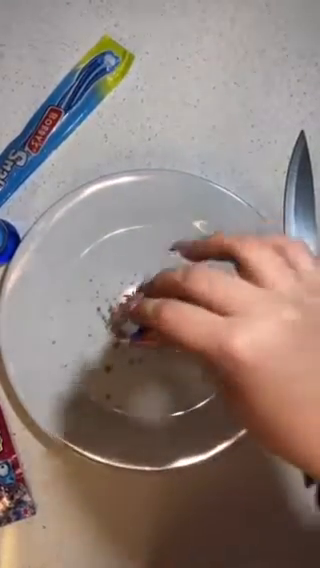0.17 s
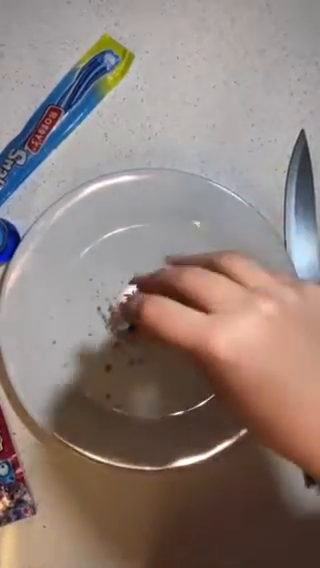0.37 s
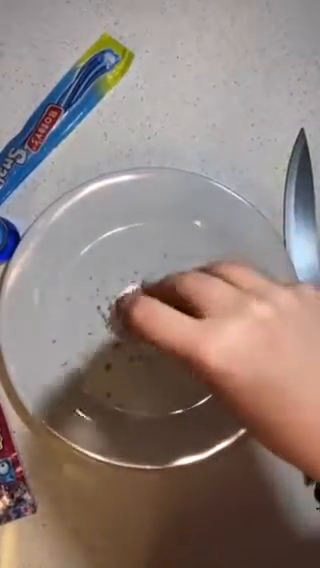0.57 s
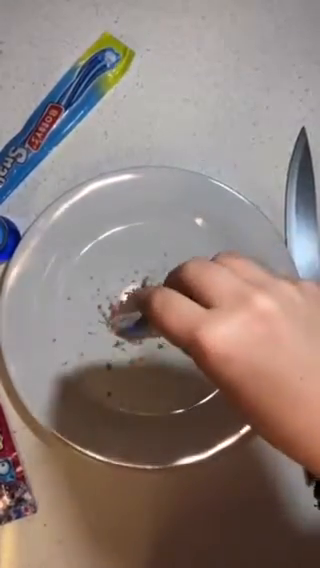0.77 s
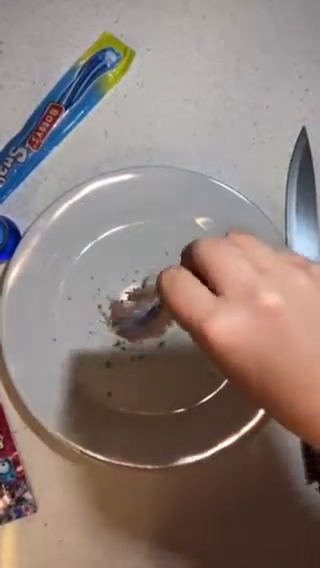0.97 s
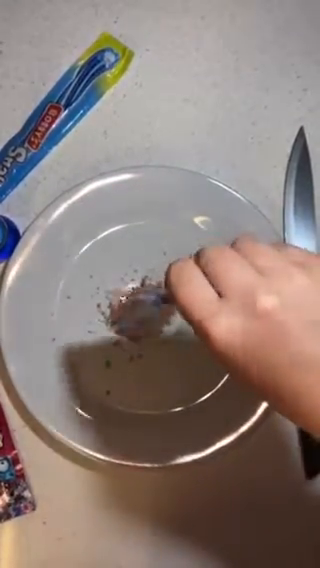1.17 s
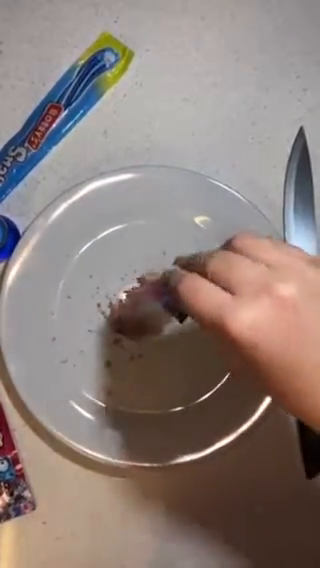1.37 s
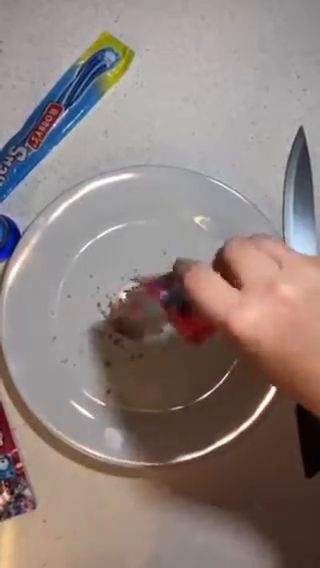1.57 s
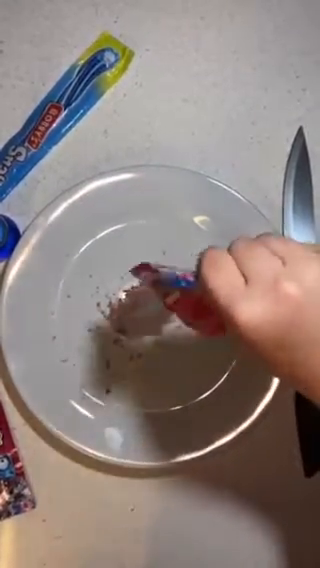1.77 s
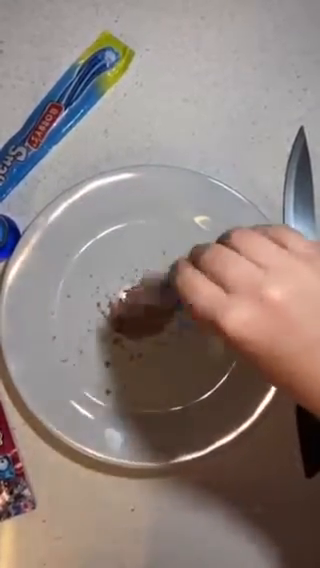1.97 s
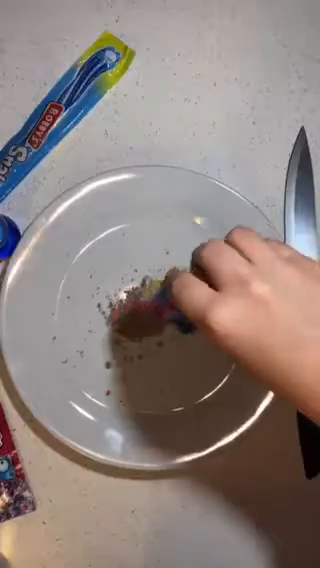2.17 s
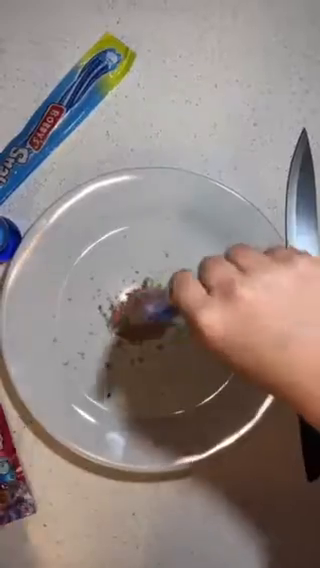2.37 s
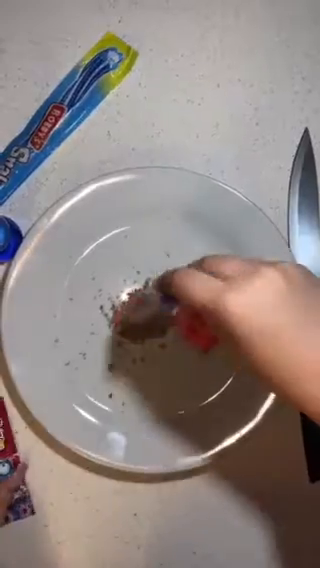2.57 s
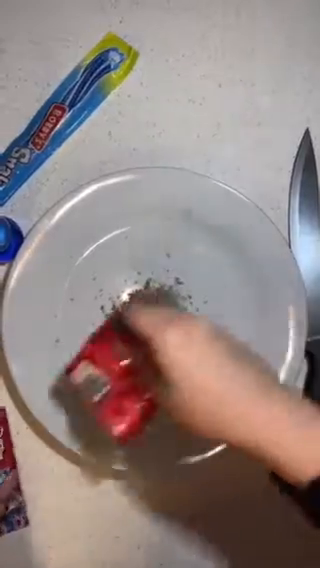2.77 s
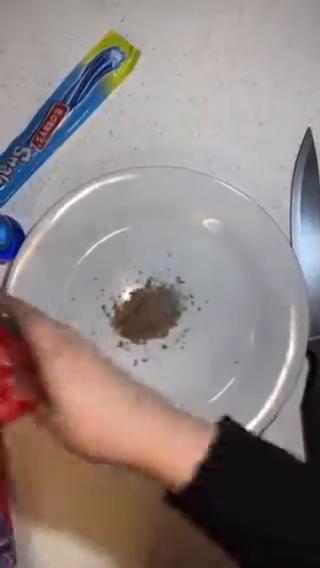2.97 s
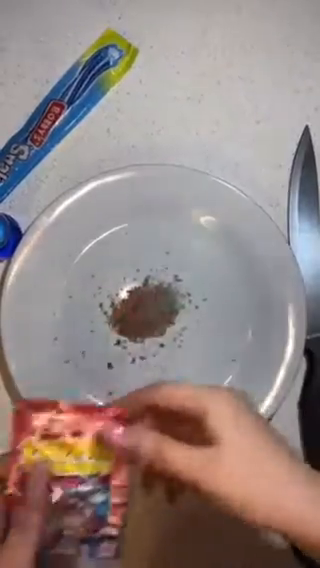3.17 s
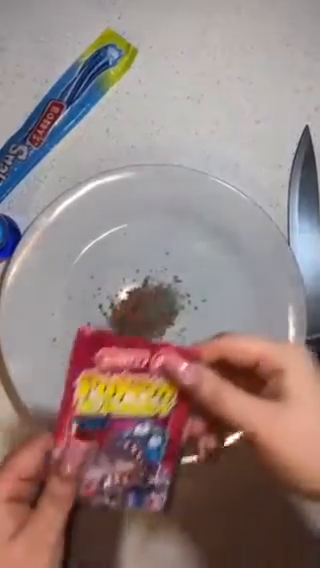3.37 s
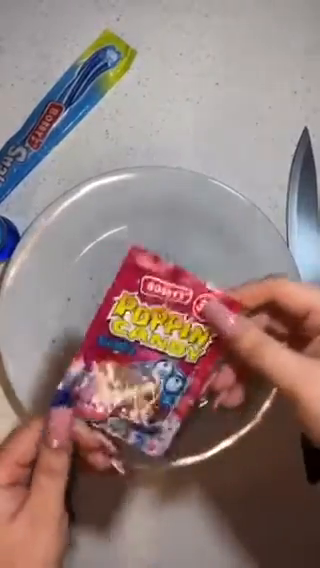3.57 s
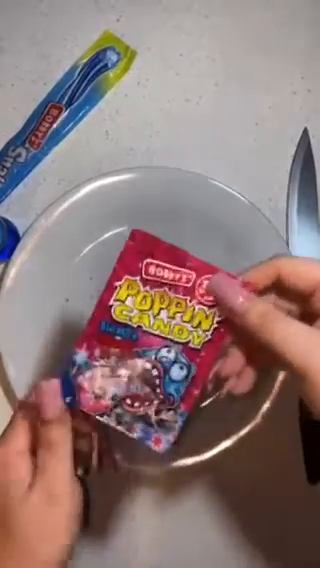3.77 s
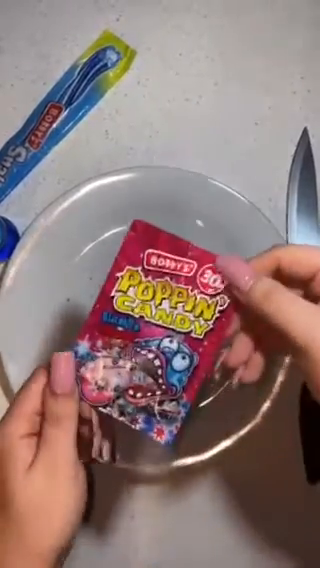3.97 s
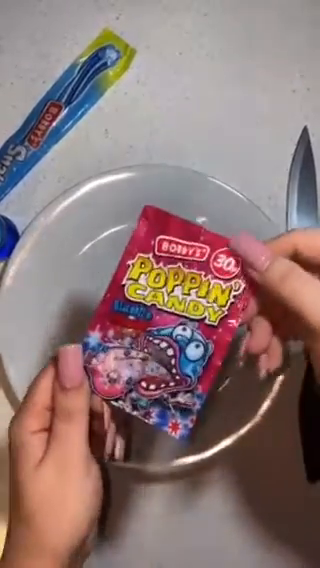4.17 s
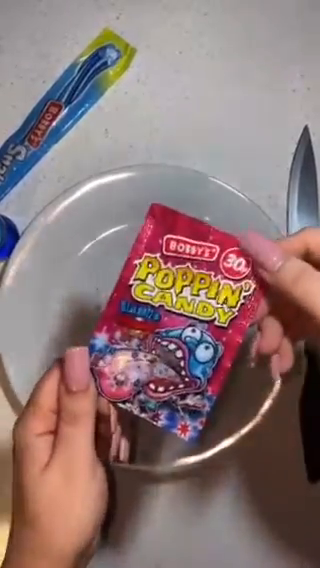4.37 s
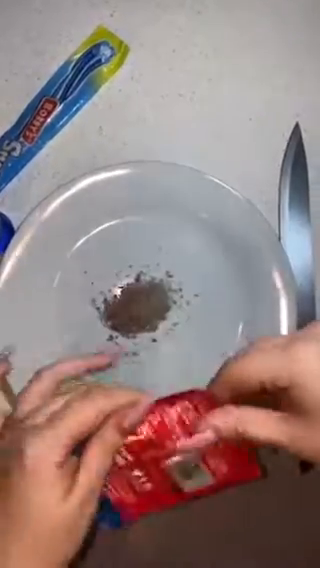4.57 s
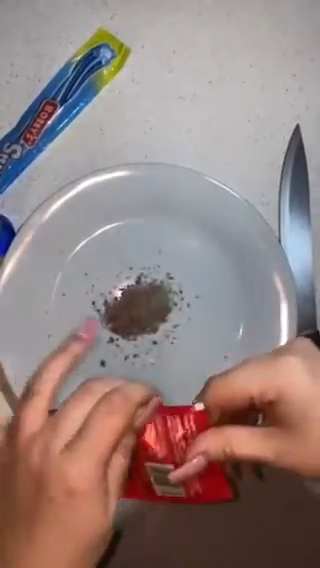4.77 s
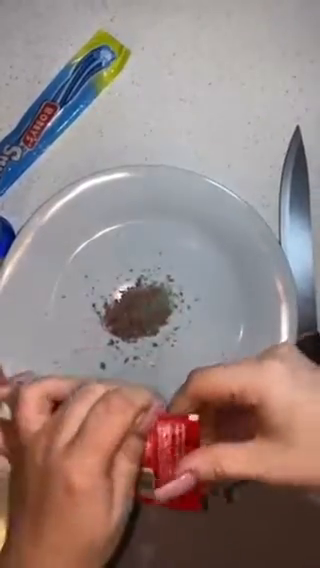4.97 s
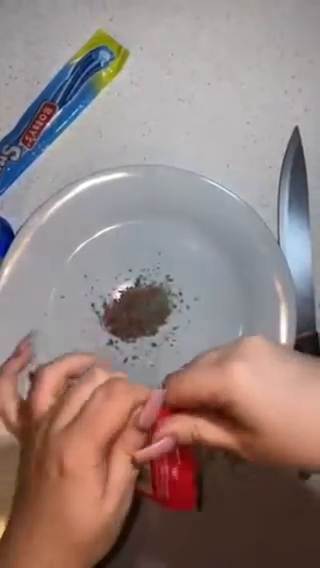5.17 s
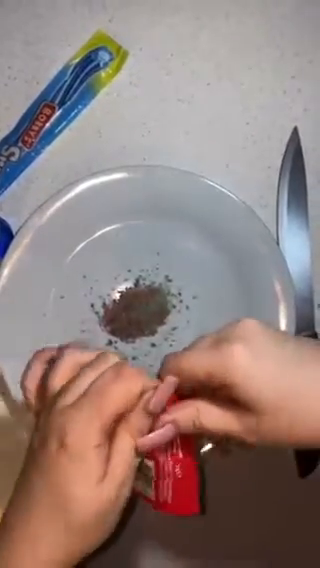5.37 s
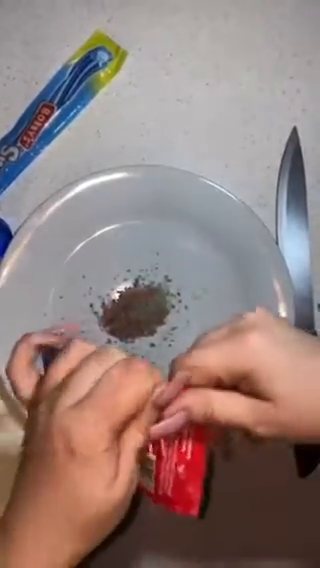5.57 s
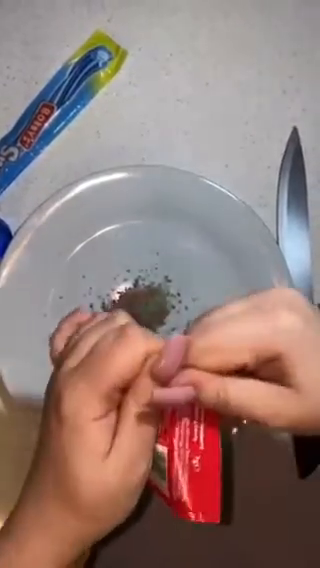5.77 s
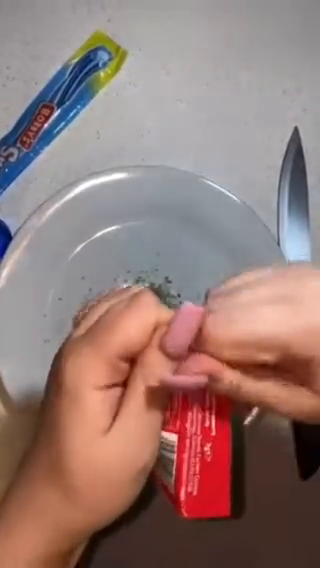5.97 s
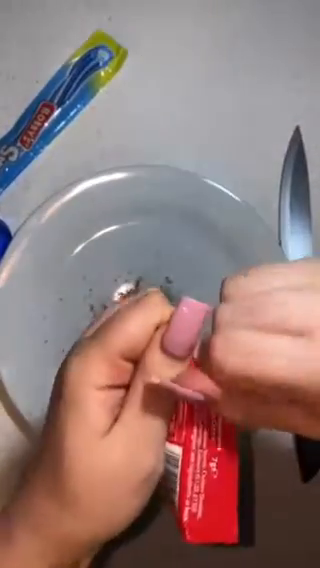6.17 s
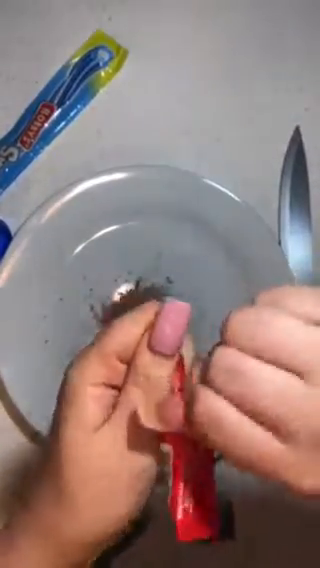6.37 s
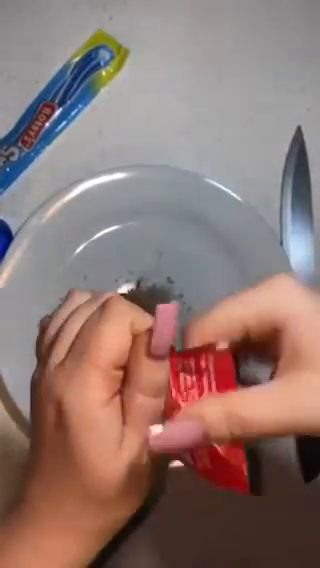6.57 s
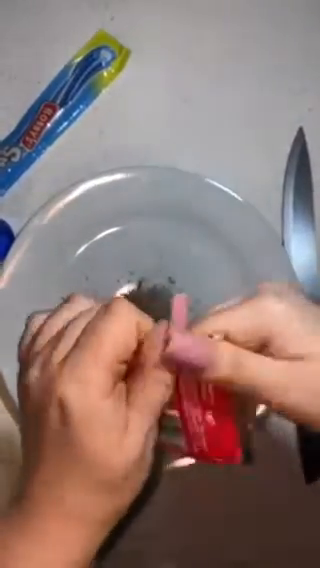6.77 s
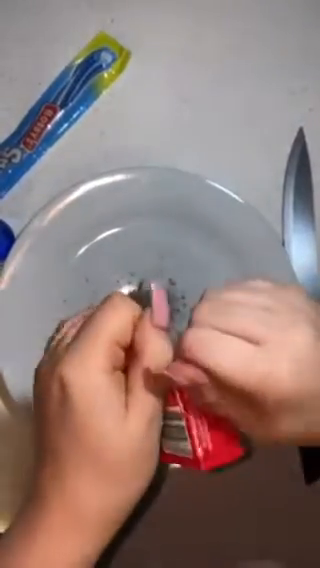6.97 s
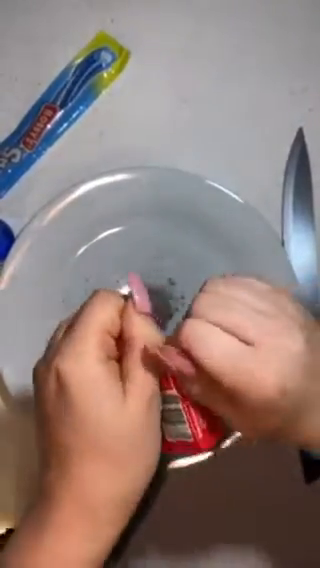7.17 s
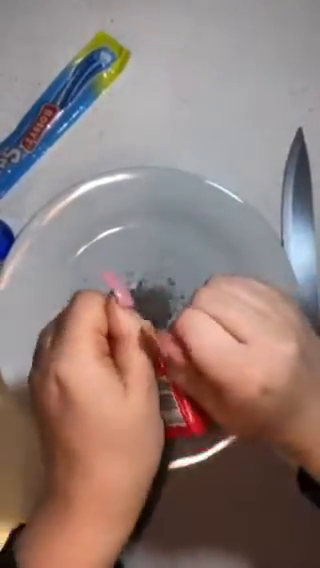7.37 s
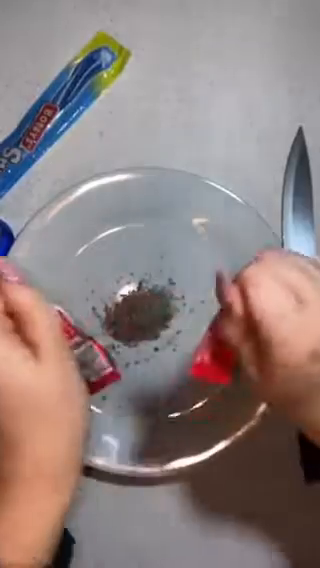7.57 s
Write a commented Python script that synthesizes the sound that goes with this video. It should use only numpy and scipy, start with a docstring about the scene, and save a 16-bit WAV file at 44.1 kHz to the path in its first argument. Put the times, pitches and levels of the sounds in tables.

```python
"""Foil sachets in a kitchen

Hands crinkle and tear foil-lined sachets over a plate on a counter, heard by a phone close above.
Creases buckle as short noise bursts over a crowd of tiny snaps and a hiss, and the kitchen answers with a tail.
Soft thuds are fading sine waves with a puff of noise; shaped noise makes a wavering hum and a faint drone.
One thin tick is heard on the way."""
import sys
import numpy as np
from scipy import signal
from scipy.fft import rfft, irfft, next_fast_len
from scipy.io import wavfile
from scipy.ndimage import uniform_filter1d, map_coordinates

SR = 44100
rng = np.random.default_rng(int(sys.argv[2]) if len(sys.argv) > 2 else 0)


def output_pcm(signal):
    """Save a mono or channel-first signal as 16-bit PCM at the path in sys.argv[1].

    Samples are clipped to [-1, 1] before scaling.
    """
    pcm = np.clip(np.atleast_2d(signal).T, -1, 1) * 32767
    wavfile.write(sys.argv[1], SR, np.round(pcm).astype(np.int16))


N = 336042

# Loud snaps of creases: t/s, relative level/dB, pitch of the panel f/Hz, relative level of the dull body/dB
SNAP_EVENTS = [(0.371, -30.5, 3800, -7.5), (0.389, -40, 2260, 0), (0.5189, -33, 2260, 5),
               (0.5725, -32, 1910, 18), (0.5895, -15, 2780, -37), (0.5968, -15.5, 3740, -14),
               (0.6125, -22, 3350, -3.5), (0.6485, -8, 3400, -16.5), (0.663, -34, 3930, -4),
               (0.7442, -20.5, 2720, -19), (0.783, -23, 6860, -10), (0.821, -19, 2530, -12.5),
               (0.875, -32, 4040, -11), (0.893, -26.5, 6260, -27), (0.922, -16.5, 7400, -23),
               (1.068, -47.5, 1600, -5), (1.097, -31, 2100, -7.5), (1.232, -24.5, 3660, -12),
               (1.2367, -17.5, 5200, -28), (1.2491, -23, 5700, -14), (1.261, -12, 7100, -17.5),
               (1.2702, -23.5, 2960, -17), (1.2808, -32, 7900, -24), (1.3241, -22, 5600, -13),
               (1.336, -22, 2620, -11), (1.4031, -25, 2840, -16), (1.476, -40, 6500, -9),
               (1.488, -35.5, 5760, -10), (1.507, -29.5, 5800, -11), (1.5283, -25.5, 4700, -33),
               (1.5517, -24, 2680, -10), (1.5702, -20.5, 3240, -14.5), (1.5938, -22, 3140, -14),
               (1.6057, -26.5, 5850, -29), (1.6473, -25.5, 5240, -17), (1.71, -20, 2700, -20),
               (1.719, -25, 5700, -16), (1.7444, -20.5, 6360, -17), (1.8542, -21, 4420, -11.5),
               (1.8991, -21.5, 5940, -13.5), (1.917, -28, 5730, -4.5), (1.9752, -39, 3200, 11),
               (1.9904, -24.5, 3460, -13.5), (2.027, -34.5, 1990, 7), (2.0514, -22, 5860, -11),
               (2.075, -30.5, 6600, -10), (2.12, -27, 6200, -16), (2.18, -23.5, 6060, -16),
               (2.212, -28, 3380, -11.5), (2.2567, -25.5, 2500, -13), (2.283, -37, 2520, -9),
               (2.2918, -11.5, 7440, -22), (2.418, -26, 6400, -12), (2.431, -32, 5240, -8),
               (2.4614, -24.5, 3630, -6), (2.4995, -17, 6400, -12), (2.5438, -28.5, 5940, -12),
               (2.583, -16.5, 5000, -16), (2.606, -35, 2300, 6), (2.6336, -28.5, 2400, -10),
               (2.647, -24.5, 3620, -4), (2.6685, -26, 3030, -19), (2.6744, -26, 3000, -8),
               (2.6988, -33, 2800, -4), (2.717, -17, 5450, -3), (2.7545, -33, 2300, 4),
               (2.7632, -20.5, 2750, -8), (2.8, -29.5, 2570, -7), (2.873, -21, 2350, -2),
               (2.9416, -38, 2800, 8), (3.1225, -39, 5370, -13), (3.283, -39.5, 2150, -37),
               (3.5062, -31.5, 4900, -44), (3.532, -34.5, 6570, -11), (3.6072, -29, 4940, -9),
               (3.8006, -40.5, 3680, -11), (3.935, -43.5, 2500, -2.5), (4.0002, -43, 6730, -30.5),
               (4.1, -44.5, 5860, -5), (4.504, -43.5, 2010, 1.5), (4.568, -22.5, 3580, -7),
               (4.575, -23, 2330, -9), (4.5876, -23.5, 6000, 0), (4.6146, -26, 1800, -14),
               (4.629, -31, 6590, -15), (4.648, -28, 2220, 3), (4.666, -17, 5670, -13),
               (4.6938, -24.5, 3020, -32), (4.8445, -26.5, 1630, -4), (4.8534, -28, 1810, 4),
               (4.876, -16.5, 2110, -7.5), (4.9459, -30, 2540, -7.5), (5.008, -29.5, 2000, -8.5),
               (5.086, -27.5, 1790, -7), (5.136, -27.5, 7350, -13), (5.1592, -22.5, 1960, -42),
               (5.3312, -33.5, 4900, -9), (5.356, -36.5, 5300, -10), (5.407, -39, 1790, -2),
               (5.497, -35.5, 2580, -3.5), (5.5204, -26.5, 1920, 10), (5.561, -37.5, 2480, -8),
               (5.573, -38.5, 2600, 1), (5.6393, -32.5, 2350, -3), (5.6442, -32.5, 5260, -9),
               (5.6643, -30, 7600, -11), (5.67, -24, 2470, -24), (5.7957, -23.5, 3470, -16),
               (5.843, -19, 3470, -8), (5.8874, -8, 3280, -18.5), (5.941, -31, 2800, 3),
               (6.062, -36.5, 5700, -19), (6.081, -34.5, 4380, -15), (6.105, -31, 4070, -20),
               (6.144, -44, 7050, -25), (6.1607, -34.5, 3700, -25), (6.211, -27, 5830, -5.5),
               (6.2582, -31.5, 2650, -11), (6.268, -33.5, 7700, -10), (6.296, -40, 6500, -9),
               (6.3046, -37.5, 6660, -9), (6.4215, -19.5, 3230, -17.5), (6.4797, -25.5, 5200, -6.5),
               (6.4892, -27.5, 2040, 4), (6.514, -19.5, 3240, -18), (6.5204, -8, 5950, -11),
               (6.5775, -15.5, 3830, -9.5), (6.6118, -15.5, 2430, -48), (6.6874, -34, 2120, -10),
               (6.713, -32.5, 2320, -21), (6.728, -31.5, 3400, -14), (6.7878, -27, 2060, 3),
               (6.819, -26.5, 2390, -6), (6.846, -24.5, 5140, -6.5), (6.881, -22.5, 2320, -12),
               (6.9279, -26, 2400, -8), (7.067, -36, 2570, -12), (7.0723, -22.5, 6600, -14),
               (7.131, -25, 3900, -15.5), (7.2096, -20.5, 8500, -22), (7.2973, -27.5, 2370, -4),
               (7.302, -25, 1590, -13), (7.371, -24.5, 5800, -10), (7.3996, -19, 5950, -14),
               (7.413, -13.5, 8300, -11.5), (7.4275, -10.5, 5200, -9.5), (7.434, -11, 6200, -15),
               (7.4392, -28, 3300, -10), (7.4405, -8.5, 3600, -18.5), (7.4588, -10.5, 7350, -17),
               (7.4664, -18, 6200, -29), (7.4696, -11.5, 5900, -28)]
# Fingers crumple, slide or rip: start t/s, held t/s, relative rustle level/dB, dying away/(dB per s)
CRUMPLE_EVENTS = [(0.0, 0.0082, -52.5, 146), (0.368, 0.006, -44, 220), (0.578, 0.09, -34, 93),
                  (1.24, 0.025, -27, 97), (1.53, 0.077, -32, 98), (1.9, 0.053, -37.5, 98),
                  (2.441, 0.087, -29.5, 150), (2.58, 0.17, -33, 224), (2.88, 0.0067, -31, 177),
                  (3.14, 0.041, -41, 100), (3.301, 0.029, -42.5, 200.5), (3.43, 0.023, -42, 100),
                  (3.531, 0.083, -44, 198.5), (3.801, 0.012, -49.5, 134.5), (3.945, 0.0088, -34.5, 452),
                  (4.501, 0.007, -39.5, 200), (4.585, 0.022, -30, 108), (4.852, 0.043, -32.5, 140),
                  (5.078, 0.099, -36, 124), (5.33, 0.043, -43.5, 130), (5.659, 0.0069, -39.5, 138),
                  (6.08, 0.28, -41.5, 142), (6.5, 0.11, -30, 90), (6.8, 0.13, -38.5, 60),
                  (7.421, 0.022, -14, 334)]
# Colour of the bright foil sheet: f/Hz, relative level/dB
FOIL_COLOUR = [(300, -49), (1000, -29.5), (2000, -1), (3500, 3.5), (6000, 2.5), (9000, 1), (10500, -0.5),
               (12500, -13), (16000, -39.5)]
# Colour of the duller body under a snap: f/Hz, relative level/dB
BODY_COLOUR = [(150, -56), (400, -4.5), (900, -4), (1600, -0.5), (2500, 8), (5000, -30.5)]
# Colour of fingers sliding on foil: f/Hz, relative level/dB
SKIN_COLOUR = [(200, -51), (600, -7.5), (1500, -3.5), (3000, 5), (6000, 3.5), (9000, 0), (10500, -7.5),
               (12000, -54)]
# Hand or sachet meets the counter: t/s, relative level/dB, pitch f/Hz
THUD_EVENTS = [(2.479, -26.5, 520), (2.584, -29, 520), (2.799, -27.5, 91), (2.971, -35, 310),
               (2.976, -24, 70), (6.211, -35, 365), (6.852, -36.5, 314),  (7.464, -20.5, 410)]
# How long the kitchen's tail takes to fall by 60 dB: f/Hz, t/s
KITCHEN_DECAY = [(300, 0.14), (1500, 0.16), (5000, 0.098), (11000, 0.13)]
# Hum in the counter as time passes: t/s, level/dB
HUM_LEVEL = [(0.0, -40.5), (0.08, -67), (0.36, -51), (0.4, -39), (0.57, -50), (0.63, -39.5), (0.98, -44.5),
             (1.1, -58), (1.25, -41), (1.46, -44.5), (1.63, -58), (1.74, -42), (1.89, -51.5), (1.97, -36),
             (2.25, -46), (2.37, -38.5), (2.84, -40.5), (3.12, -51), (3.69, -55), (3.82, -39.5),
             (4.05, -53.5), (5.01, -53), (5.45, -40.5), (5.62, -56), (5.77, -36.5), (6.22, -47),
             (7.19, -40), (7.62, -47)]
# Colour of the hum: f/Hz, relative level/dB
HUM_COLOUR = [(30, -37.5), (42, -13), (52, 2), (57, 18.5), (61, 13), (66, 10.5), (85, 1), (110, -7),
              (150, -62)]
# Drone of the appliance as time passes: t/s, relative level/dB
DRONE_LEVEL = [(0.0, -54.5), (0.8, -55.5), (1.66, -53), (2.84, -47), (3.08, -56), (6.92, -53.5),
               (7.07, -50.5), (7.62, -48.5)]
# Colour of the drone's noise: f/Hz, relative level/dB
DRONE_COLOUR = [(60, -31), (90, -1.5), (135, 1.5), (190, -10.5), (300, -11.5), (420, -14.5), (660, -17),
                (1100, -28.5), (2500, -39.5), (6000, -50), (9000, -63), (11000, -110)]
# Fuzzy tones in the drone: centre f/Hz, width at half height f/Hz, level against the drone's noise/dB
DRONE_TONES = [(238.5, 7.6, -11), (277.3, 11, -7)]
# How far the left port runs ahead of the right: f/Hz, phase/radians
LEFT_LEAD = [(60, 0), (250, -.2), (520, -.35), (800, -1), (1150, -1.7), (1460, -.5), (1980, .5),
             (2300, 1.9), (2800, 2.3), (3750, .5), (4400, 1.5), (4850, 3.2), (5400, 6.6), (7500, 7.7),
             (10000, 8.5), (12500, 9.4), (16500, 9.42)]
# How much louder the left port is than the right: f/Hz, level/dB
LEFT_GAIN = [(100, 0), (380, -1.2), (700, .3), (1300, -4), (2400, -3), (3500, 0), (4400, -2.5), (5500, 0),
             (15000, 0)]
# Gain on the part that differs between the two ports: f/Hz, level/dB
DIFFERENCE_GAIN = [(60, -33), (120, -24), (250, -16), (700, -6), (2000, -7), (5000, -8), (8000, -10),
                   (12000, -18)]

GRIP_DB_PER_S, SETTLE_DB_PER_S = 605, 138  # the rustle swells into a crumple, and dies after a snap
AFTER_DB, AFTER_SHARE = -25, 0.63  # rustle after a snap, and how far it follows the snap's dB
STILL_DB = -79  # rustle of foil held still
CRACK, CRACK_AT_S, CRACK_S = .9, .0019, .0007  # the fold flips: added gain, when, how long
TICK_S, TICK_DB, TICK_FADE_S = 3.03104, -35.5, .004  # when it jumps, how high, time to fall to 37 %
TOP_HZ = 16500  # half amplitude of the steep treble cut


def amp(db):
    """Turn dB into a gain."""
    return 10 ** (np.asarray(db) / 20)


def unit(x):
    """Scale each row to an rms (average strength) of 1."""
    return x / np.sqrt(np.mean(x ** 2, axis=-1, keepdims=True) + 1e-20)


def along(points, hz):
    """Read a curve of (f/Hz, value) points on a log frequency axis."""
    f, v = np.transpose(points)
    return np.interp(np.log(hz + 1), np.log(f + 1), v)


def level_curve(rows):
    """Join (t/s, level/dB) points by straight lines, one value per sample."""
    s, db = np.transpose(rows)
    return np.interp(np.arange(N) / SR, s, db)


def wobble(rate):
    """Draw a smooth random curve through `rate` random points a second."""
    points = rng.standard_normal(int(N * rate / SR) + 4)
    return map_coordinates(points, [np.arange(N) * rate / SR])


def filtered(x, response):
    """Multiply the spectrum of x by a function of frequency."""
    m = next_fast_len(x.shape[-1] + 8192)  # spare room, so that the ends do not mix
    return irfft(rfft(x, m) * response(np.fft.rfftfreq(m, 1 / SR)), m)[..., :x.shape[-1]]


def noise(colour):
    """Make two unrelated rows of coloured noise."""
    return unit(filtered(rng.standard_normal((2, N)), lambda hz: amp(along(colour, hz))))


def laid(s, rows):
    """Add up short sounds at their times, with one result for each leading row."""
    at = np.round(s * SR).astype(int)[:, None] + np.arange(rows.shape[-1])
    rows = rows.reshape((-1,) + at.shape)
    return np.array([np.bincount(at.ravel(), row.ravel(), N + SR)[:N] for row in rows])


def sachet():
    """Loud snaps, then a crowd of small ones and sliding fingers whose levels follow the handling."""
    rustle_db = handling()
    snaps = buckles(*np.transpose(SNAP_EVENTS), t60=.013, size=1024)
    u = rng.random((1700, 4))  # time, size, pitch and body of each small snap
    s = u[:, 0] * (N - 1) / SR
    size_db = rustle_db[(s * SR).astype(int)] - 11 - 5 * np.log(u[:, 1] + .03)  # many small, few large
    panel_hz = 2000 * 3.1 ** u[:, 2]
    body_db = -20 + 16 * u[:, 3]
    crowd = buckles(s, size_db, panel_hz, body_db, t60=0.0035, size=384)
    return snaps + crowd, sliding_fingers(rustle_db)


def buckles(s, db, panel_hz, body_db, t60, size):
    """A crease lets go: a short burst, boosted at the pitch of the panel it frees, on a duller body.
    Gives two bursts for the ports, and a smooth-spectrum sum over all directions for the walls."""
    t, hz = np.arange(size) / SR, np.fft.rfftfreq(size, 1 / SR)
    panel_hz = panel_hz[:, None]
    panel = 1 + 1.9 * np.exp(-(np.log((hz + 1) / panel_hz) / .12) ** 2)
    tilt_db = 6 * np.log(panel_hz / 4000) * np.log((hz + 500) / 4500)  # small panels snap brighter
    sheet_gain = unit(amp(along(FOIL_COLOUR, hz) + tilt_db) * panel)
    body_gain = amp(body_db - 2.5)[:, None] * unit(amp(along(BODY_COLOUR, hz)))
    white = rfft(rng.standard_normal((len(s), 2, 2, size))).transpose(1, 2, 0, 3) / np.sqrt(size)
    crack = 1 + CRACK * np.exp(-((t - CRACK_AT_S) / CRACK_S) ** 2)
    rise = crack * (1 - np.exp(-t / .001)) ** 2  # the fold runs along the crease for a moment
    sheet = irfft(white[0] * sheet_gain) * amp(-60 * t / t60)
    body = irfft(white[1] * body_gain) * amp(-60 * t / (2.17 * t60))
    bursts = unit(rise * (sheet + body))
    # a click with the same colours, moved 64 samples later to make room for its front half
    around = np.roll(irfft(np.hypot(sheet_gain, body_gain)), 64, axis=1) * np.sqrt(size)
    gain = amp(db - 10.5)[:, None] * np.sqrt(t60 * SR / size)
    return laid(s, gain * np.concatenate([bursts, around[None]]))


def handling():
    """Rustle level in dB: each crumple swells, holds and dies away; the foil settles after each snap."""
    t = np.arange(0, N / SR + .01, .002)
    start, held, db, dying = np.transpose(CRUMPLE_EVENTS)[:, :, None]
    swell_db = GRIP_DB_PER_S * np.clip(start - t, 0, None)
    fade_db = dying * np.clip(t - start - held, 0, None)
    crumple = amp(db - swell_db - fade_db)
    snap_s, snap_db = np.transpose(SNAP_EVENTS)[:2, :, None]
    settle_db = SETTLE_DB_PER_S * np.abs(t - snap_s)
    after = (t > snap_s) * amp(AFTER_DB + AFTER_SHARE * snap_db - settle_db)
    power = np.sum(crumple ** 2, axis=0) + np.sum(after ** 2, axis=0) + amp(STILL_DB) ** 2
    return np.interp(np.arange(N) / SR, t, 10 * np.log10(power))


def sliding_fingers(rustle_db):
    """Skin rubs on foil: coloured noise that flutters slowly and quickly around the rustle level."""
    flutter_db = 3.5 * wobble(40) + 2.5 * wobble(170)
    return amp(rustle_db - 15 + flutter_db) * noise(SKIN_COLOUR)


def thuds():
    """Soft contacts: the counter rings as a quickly fading sine wave, with a dull puff of noise."""
    s, db, hz = np.transpose(THUD_EVENTS)[:, :, None]
    t = np.arange(8192) / SR
    fade = amp(-60 * t * np.sqrt(hz) / 1.08) * (1 - np.exp(-t / 0.0013))  # higher pitches die sooner
    white = rng.standard_normal((len(s), len(t)))
    puff = unit(filtered(white, lambda f: (f / hz) / (1 + (f / hz) ** 3)))
    ring = np.sin(2 * np.pi * hz * t) * 100 / hz
    puff_gain = 0.78 * np.clip(hz / 300, 0, 1)
    return laid(s[:, 0], amp(db) * fade * (ring + puff_gain * puff))


def kitchen(x):
    """The walls answer with fading noise, drawn anew each quarter second; each pitch dies at its speed."""
    out, step = np.zeros((2, N + 2 * SR)), SR // 4
    for start in range(0, N, step):
        hz, t, z = signal.stft(rng.standard_normal((2, SR // 2)), SR, nperseg=256)
        fade = amp(-60 * t / along(KITCHEN_DECAY, hz)[:, None])
        tail = signal.istft(z * fade, SR, nperseg=256)[1]
        tail = tail / np.linalg.norm(tail[0])
        wet = signal.fftconvolve(x[None, start:start + step], tail, axes=1)
        first = start + 150  # the answer comes 150 samples late
        out[:, first:first + wet.shape[1]] += wet
    return out[:, :N]


def counter_hum():
    """The counter hums: low noise, evened out by its own recent strength, then made to waver."""
    hum = noise(HUM_COLOUR)
    steady = hum / np.sqrt(np.abs(uniform_filter1d(hum ** 2, size=3000)) + 0.023)
    return amp(level_curve(HUM_LEVEL)) * steady


def appliance_drone():
    """An appliance drones: soft noise plus narrow bands of noise heard as fuzzy tones."""
    tones = 0
    for hz, width, db in DRONE_TONES:
        white = rng.standard_normal((2, N))
        tones = tones + amp(db) * unit(filtered(white, lambda f: 1 / (1 + (2 * (f - hz) / width) ** 2)))
    level_db = level_curve(DRONE_LEVEL) - 2.0 + 2.57 * wobble(4.076)
    return amp(level_db) * (noise(DRONE_COLOUR) + tones)


def scene():
    """Mix all sources; of each pair of rows, one is shared by both ports and one differs between them."""
    (*bursts, around), slide = sachet()
    thud = thuds()[0]
    walls = amp(-7.5) * kitchen(0.38 * around + 0.71 * bursts[0] + thud)
    shared, own = bursts + slide + counter_hum() + appliance_drone() + walls
    own = filtered(own, lambda hz: amp(along(DIFFERENCE_GAIN, hz)))
    return shared + thud + np.array([own, -own])


def record(dry):
    """The phone's two ports shift and weight pitches oppositely; a tick is added, bass and top are cut."""
    side = np.array([[.5], [-.5]])  # half of each left-right difference goes to each port

    def port_response(hz):
        """Loudness and phase of each port."""
        return amp(side * along(LEFT_GAIN, hz)) * np.exp(1j * side * along(LEFT_LEAD, hz))

    ports = filtered(dry, port_response)
    since = np.arange(N) / SR - TICK_S
    tick = amp(TICK_DB) * (since > 0) * np.exp(-np.abs(since) / TICK_FADE_S)  # alike in both channels
    bass_cut = signal.butter(4, 45, "high", fs=SR, output="sos")
    ports = signal.sosfilt(bass_cut, ports + tick)
    return filtered(ports, lambda hz: 1 / (1 + (hz / TOP_HZ) ** 120))


dry = scene()
out = record(dry)
output_pcm(out)
```